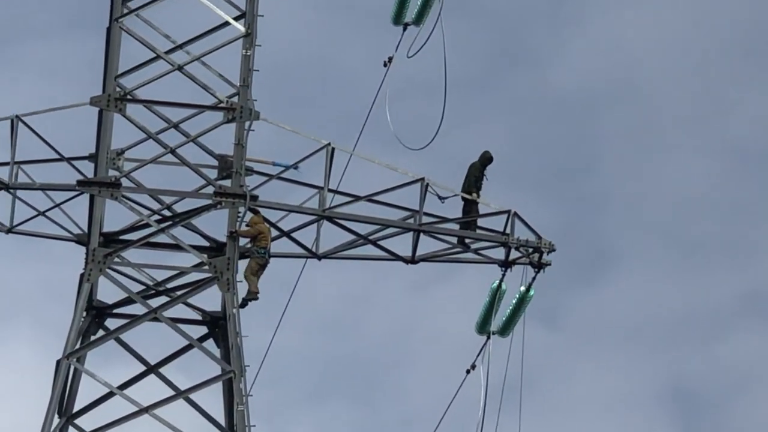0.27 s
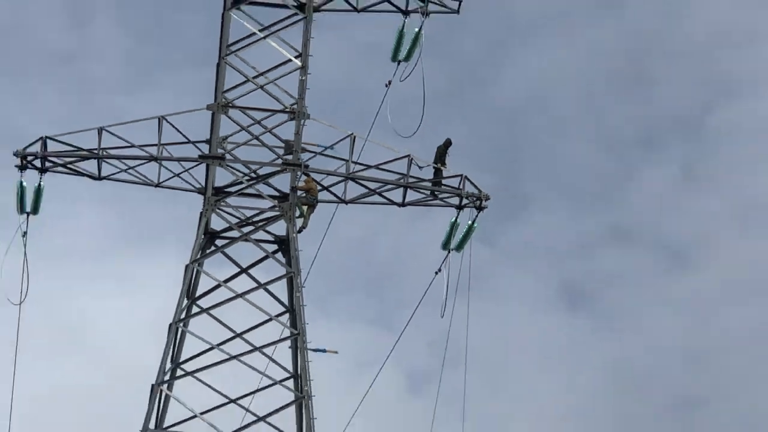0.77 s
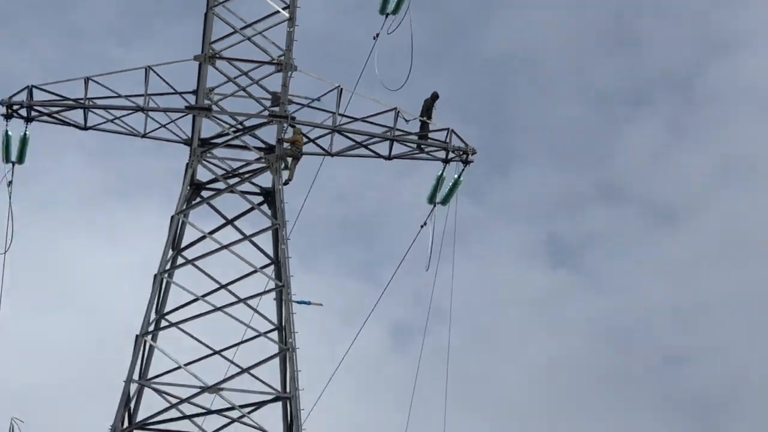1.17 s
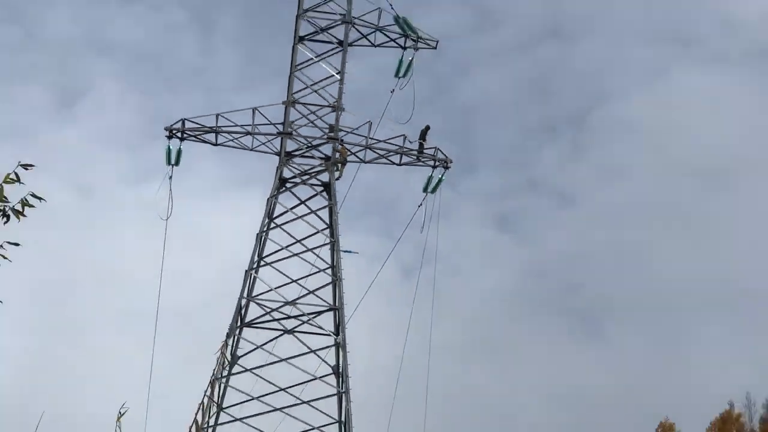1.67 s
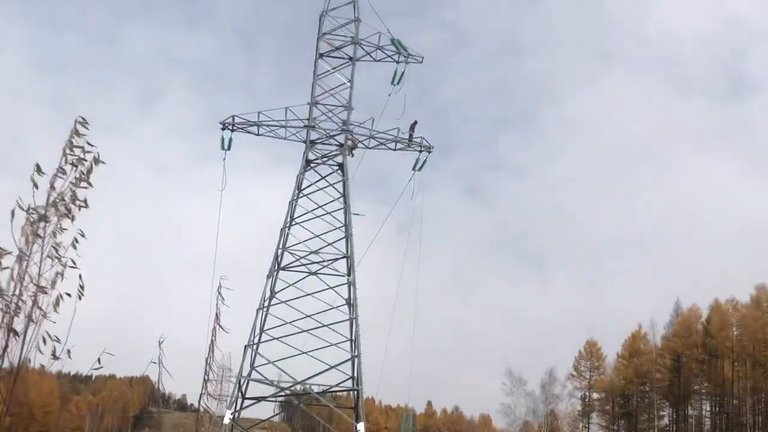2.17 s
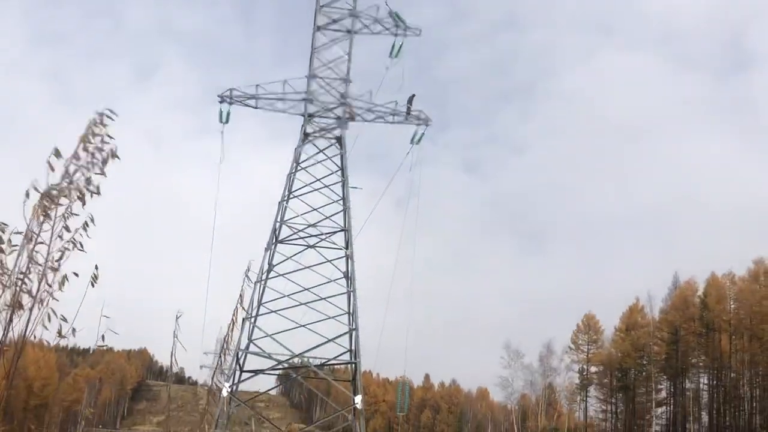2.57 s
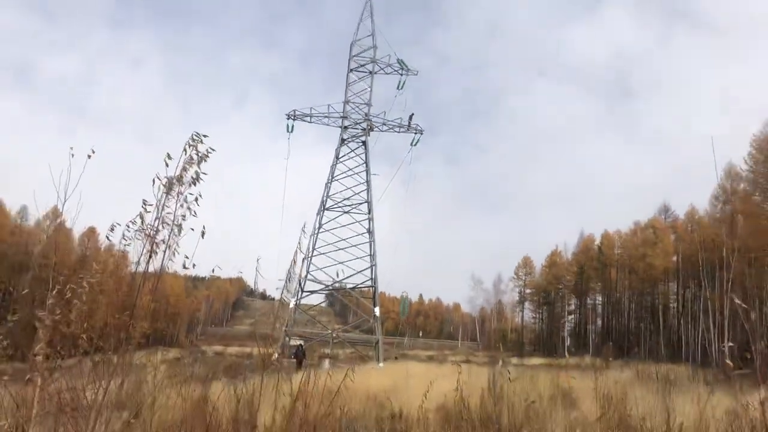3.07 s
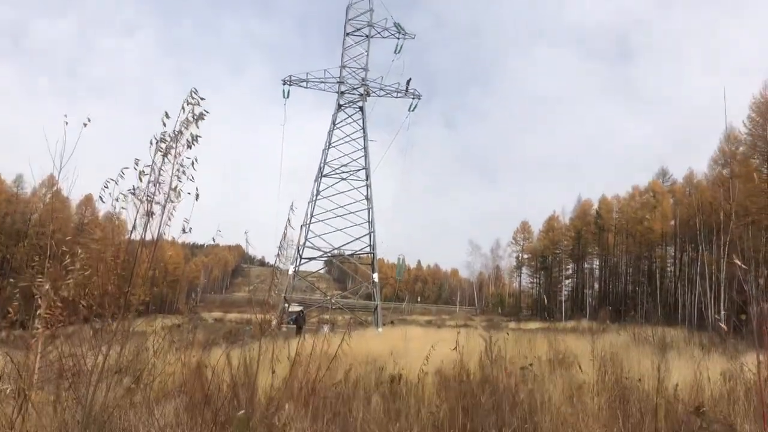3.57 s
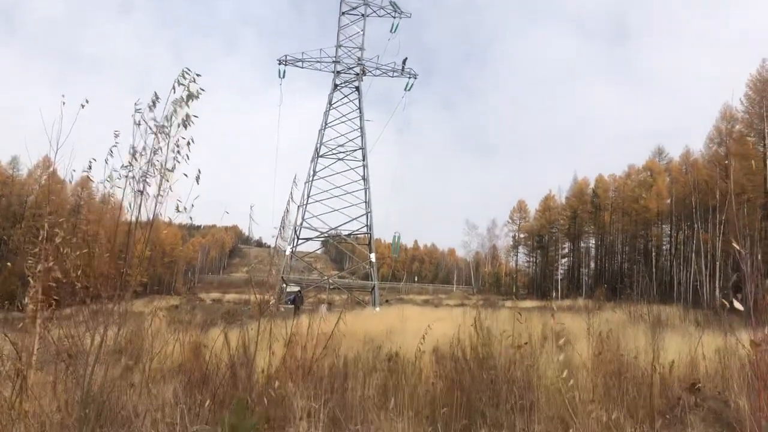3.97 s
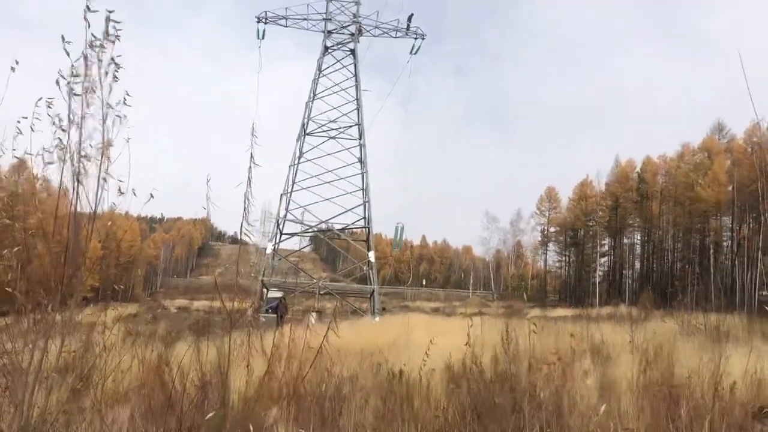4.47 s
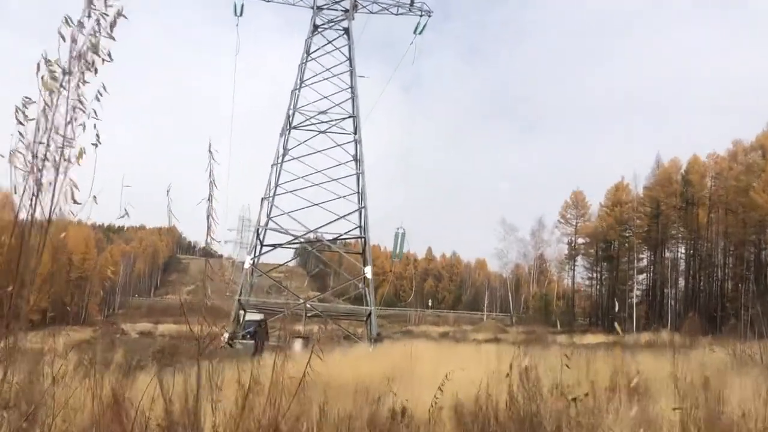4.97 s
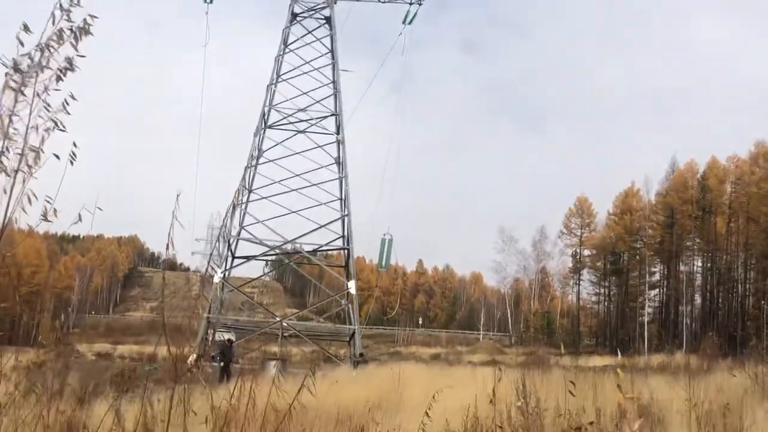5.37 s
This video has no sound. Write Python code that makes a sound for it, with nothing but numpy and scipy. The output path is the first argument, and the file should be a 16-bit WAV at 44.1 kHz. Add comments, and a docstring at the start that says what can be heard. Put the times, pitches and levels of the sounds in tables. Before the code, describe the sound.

Outdoors in an open autumn field, an engine some way off runs at a constant speed, a low buzzing drone with a soft roar and faint metallic ringing. Wind bumps the microphone in short muffled bursts around one second, three seconds and, hardest, four and a half to five. A dry stalk swishes once close by early on, over thin grass hiss.

```python
"""In an open autumn field, an engine runs at a steady speed some way off.
Its exhaust drones and its shafts hum as sums of sinusoids, its gears whine faintly, and filtered noise
gives its roar and ringing casing. Gusts throw eddies at the microphone, each a short low pressure bump.
A stalk swishes and ticks close by in decaying bursts of noise; dry grass hisses as shaped steady noise."""
import sys
import numpy as np
from scipy import signal
from scipy.fft import rfft, irfft
from scipy.io import wavfile

SR = 44100
rng = np.random.default_rng(int(sys.argv[2]) if len(sys.argv) > 2 else 0)


def transcribe(signal):
    """Save signal, clipped to [-1, 1], as a 16-bit WAV file at the path in sys.argv[1]."""
    frames = np.atleast_2d(signal).T
    limited = np.clip(frames, -1, 1)
    pcm = np.round(limited * 32767).astype(np.int16)
    wavfile.write(sys.argv[1], SR, pcm)


N = 247842  # length in samples
TIME, FREQ = np.arange(N) / SR, np.fft.rfftfreq(N, 1 / SR)  # s, Hz

FIRING_HZ = 81.77  # mean firing rate
WHINE_ORDER = 48  # gear whine as a multiple of the firing rate
WHINE_FLUTTER_DB = 1.5  # rms
SWIRL_DB = -11.5  # the swirl around an eddy, relative to its peak
RISE_SHARE = 0.5  # part of a gust's length spent swelling
GUST_EDGE_DB = -6.5  # level at the ends of that length, relative to the crest
EDGE_HZ = 15700  # upper band limit

# Exhaust note and gear tones. Each row: multiple of the firing rate, level in dB rms before fading.
EXHAUST_ORDERS = [(1, -55), (2, -45.5), (3, -58.5), (4, -49.5), (5, -47.5), (6, -55), (7, -55), (9, -65.5),
                  (10, -58.5), (11, -59.5), (12, -63), (13, -72), (15, -73.5), (16, -65.5), (32, -82.5),
                  (40, -79)]
# Hum of other shafts and panels. Each row: mean frequency in Hz, level in dB rms before fading.
SHAFT_HUM = [(35, -61), (53.3, -49.5), (70.1, -43), (105.3, -52), (124, -62), (221, -56.5), (307, -54),
             (320.4, -54.5), (373.8, -52), (467, -62.5), (1203, -73), (2653, -94), (2897, -86), (3305, -84)]
# Gear whine, fading in and out with distance. Each row: time in seconds, level in dB rms before flutter.
GEAR_WHINE = [(0, -88), (.5, -82), (1.09, -75), (1.55, -78), (2.05, -90), (4.85, -84), (5.15, -78),
              (5.62, -83)]
# Ringing of the casing and panels. Each row: centre in Hz, width in Hz, level in dB rms before facing.
CASING_MODES = [(360, 110, -58.5), (603, 33, -61), (1266, 360, -61.5), (1440, 19, -72), (1777, 65, -72.5),
                (1976, 37, -73), (2144, 53, -74), (3300, 110, -77.5), (3950, 160, -77), (4250, 150, -83),
                (4570, 100, -82), (5250, 70, -81.5)]
# The casing is a little louder while the microphone points up. Each row: time in seconds, gain in dB.
CASING_FACING = [(0, 3), (1.4, 0.2), (2.1, 0), (5.62, -1)]
# Spectrum of the engine's broad roar. Each row: frequency in Hz, relative density in dB per Hz.
ROAR_SPECTRUM = [(15, -21.5), (28, 6.5), (50, -9.5), (75, 7), (130, 2.5), (270, -2), (370, -5), (520, -6),
                 (800, -10.5), (1250, -15), (1600, -22), (2100, -23), (2700, -33), (6000, -74)]
# Eddies that thud on their own. Each row: time in seconds, peak in dB, centre in Hz,
# steepness of the treble fall, thinness of the bass (the last two are exponents without unit).
LONE_EDDIES = [(0.3799,-13,202,1.94,0.5), (0.3845,-28.5,510,1.46,1), (0.8212,-22,380,2.2,0.3),
               (0.8312,-15.5,116,1.28,0.37), (0.8982,-14,234,1.47,0.25), (0.927,-21.5,83,2.8,1.4),
               (0.969,-18,100,2.5,1.1), (0.9791,-23,264,1.07,0.2), (0.9884,-21,177.5,2.3,1.5),
               (1.1934,-23,294,2.2,1), (1.2459,-21,110,1.7,0.8), (1.2986,-23.5,63,1.26,1.3),
               (1.3244,-14,315,1.58,1.1), (1.337,-25,116,3.8,1.4), (2.908,-27,256,2.3,1.5),
               (2.9883,-16.5,241,2.5,1.5), (2.999,-19.5,300,1.6,0.8), (3.006,-18,250,3,0.1),
               (3.024,-22,127,1.8,0.3), (3.073,-20,403,2.5,0.3), (3.086,-14.5,270,2.7,1.5),
               (3.091,-17.5,684,2.7,0.6), (3.1053,-20,210,2.1,0.6), (3.1113,-20,303,2.6,1.3),
               (3.1156,-18.5,130,2.2,1.5), (3.1967,-17.5,185,1.07,0.1), (3.2045,-18,195,3.4,0.8),
               (3.2166,-16,170,1.23,0.3), (3.616,-28,171,2.9,1.46), (3.6378,-26,170,2.4,0.1),
               (3.682,-22.5,190,1.3,0.6), (4.1896,-26,170,3,1.5), (4.219,-26,141,2.3,0.7),
               (4.261,-22.5,69.4,1.4,0.3), (4.3598,-22.5,690,1.35,0.04), (4.361,-12,189,1.68,1.5),
               (4.3858,-20,223,3.2,0.25), (4.4042,-24,600,2.6,0.1), (4.408,-16.5,340,1.9,0.4),
               (4.4191,-17,356,2.2,1.5), (4.4236,-17.5,238,1.6,1.4), (4.4345,-6.5,450,2.1,0.2),
               (4.4419,-13.5,297,1.8,0.4), (4.4548,-20.5,283,1.5,1.5), (4.4602,-8.5,490,1.164,0.46),
               (4.474,-20,172,1.6,1.4), (4.5347,-18.5,170,2,1.4), (4.5584,-20,210,2,0.7),
               (4.5764,-18.5,195,1.27,0), (4.589,-23,89,1.3,1.5), (4.7807,-18,160,1.27,1.25),
               (4.826,-14,257,2,0), (4.8365,-20.5,356,1.2,0.1), (4.8424,-13,502,2.4,1.1),
               (4.8502,-19.5,171,3.1,0.3), (4.873,-22,253,1.7,1.1), (4.886,-21,129,1.54,1.5),
               (4.8992,-18,196,1.65,1.5), (4.9208,-24,134,1.5,1.5), (4.9582,-19.5,297,1.04,0.3),
               (4.962,-17.5,151,1.2,1.5), (4.968,-13,717,1.84,0.46), (4.9691,-10,215,1.94,1.4),
               (4.9886,-23,159,2.8,0.8), (5.2822,-24,163,3.3,1.3)]
# Gusts at the microphone. Each row: time of the crest in seconds, level in dB before a common trim,
# length in seconds, centre of its eddies in Hz.
WIND_GUSTS = [(0.458, -33.5, 0.19, 128), (0.885, -32.5, 0.27, 172), (1.21, -32.5, 0.26, 159),
              (2.935, -33, 0.21, 213), (3.088, -35.5, 0.055, 527), (3.423, -37, 0.4, 191),
              (3.65, -34.5, 0.12, 340), (4.44, -31, 0.53, 119), (4.447, -28.5, 0.05, 234),
              (4.88, -34.5, 0.31, 239)]
# Dry stalks close by. Each row: start in seconds, level in dB, centre in Hz, width in octaves,
# time to decay by 60 dB in seconds.
STALK_BRUSHES = [(0.426, -47.5, 5650, 0.58, 0.042), (.45, -69, 6500, 0.6, .7),
                 (3.436, -51, 12800, .1, 0.018), (5.393, -55, 11000, .07, 0.018)]
# Spectrum of the grass hiss. Each row: frequency in Hz, relative density in dB per Hz.
GRASS_SPECTRUM = [(500, -24), (2400, 0), (3200, 5), (3700, 2.5), (4300, 3.5), (5300, -0.5), (7000, -2.5),
                  (9500, -5), (12000, -9.5), (15500, -19)]
# Grass stirred by the breeze. Each row: time in seconds, level in dB before a common trim.
BREEZE_LEVEL = [(0, -75), (.7, -78), (2.8, -71.5), (5.62, -72)]


def gain_of(db):
    """Logarithmic level: 20 dB is a factor of ten in amplitude."""
    return 10 ** (np.asarray(db) / 20)


def evened(x):
    """Normalisation of power: scales to rms 1."""
    return x / np.sqrt(np.mean(x ** 2) + 1e-20)


def along(curve):
    """Linear interpolation: a control curve at every sample."""
    return np.interp(TIME, *np.transpose(curve))


def add(mix, s, sound):
    """Superposition: mixes a sound in at s seconds."""
    part = mix[round(s * SR):][:len(sound)]
    part += sound[:len(part)]


def noise(magnitude):
    """Spectral shaping: white noise filtered by the given magnitude, at rms 1."""
    return evened(irfft(rfft(rng.standard_normal(N)) * magnitude, N))


def colour(points):
    """Magnitude response through (Hz, dB) points on a logarithmic frequency axis."""
    hz, db = np.transpose(points)
    return gain_of(np.interp(np.log(FREQ + 1), np.log(hz), db))


def drift(rate):
    """Low-passed chance of rms 1, changing up to about rate times a second."""
    return noise(np.exp(-(FREQ / rate) ** 2))


def engine_line(turns, multiple, db, blur, fade_db=1.13):
    """Propagation through moving air: a sinusoid whose level fades and whose phase wavers (radians rms)."""
    phase = 2 * np.pi * (multiple * turns + rng.random()) + blur * drift(9.5)
    level = gain_of(db + fade_db * drift(3.5))
    return level * np.sqrt(2) * np.cos(phase)


def casing_ringing():
    """Resonance: each mode of the casing passes a narrow band of noise around its centre."""
    ringing = np.zeros(N)
    for hz, width, db in CASING_MODES:
        resonance = 1 / (1 + (2 * (FREQ - hz) / width) ** 2)
        ringing += gain_of(db) * noise(resonance)
    return gain_of(along(CASING_FACING)) * ringing


def engine(wander=0.00048, hum_blur=0.21, note_blur=0.092, roar_db=-42, throb=0.086, swell_db=0.5):
    """Periodic excitation: tones follow the firing rate, and each firing modulates the broadband noise."""
    turns = np.cumsum(FIRING_HZ * (1 + wander * drift(2.5))) / SR  # firings so far

    note = sum(engine_line(turns, order, db, note_blur) for order, db in EXHAUST_ORDERS)
    hum = sum(engine_line(turns, hz / FIRING_HZ, db, hum_blur) for hz, db in SHAFT_HUM)
    whine_db = along(GEAR_WHINE) + WHINE_FLUTTER_DB * drift(7.5)
    whine = engine_line(turns, WHINE_ORDER, whine_db, hum_blur)

    roar = gain_of(roar_db) * noise(colour(ROAR_SPECTRUM))
    # the noise throbs with each firing, and every second firing is stronger
    chop = 1 + throb * (np.cos(2 * np.pi * turns) + np.cos(np.pi * turns))
    swell = gain_of(swell_db * drift(23))
    return note + hum + whine + (roar + casing_ringing()) * chop * swell


def eddy(hz, steep=1.37, thin=0.29, lag=0.89, lowest_hz=49, size=4096):
    """Dispersion: a mid-array bump whose frequencies each arrive lag cycles late, so it falls in pitch."""
    f = np.fft.rfftfreq(size, 1 / SR) + 1
    bass_cut = np.sqrt(1 + (lowest_hz / f) ** 6)
    body = (f / hz) ** thin * np.exp(-(f / hz) ** steep) / bass_cut
    bump = irfft(body * np.exp(-2j * np.pi * lag * np.log(f / hz)))
    return np.fft.fftshift(bump) * signal.windows.tukey(size) / abs(bump).max()


def wind(swirl_s=0.01094, swirl_octaves=0.74, swirl_top_hz=420, count=8):
    """Turbulent pressure: large eddies thud one by one, each amid a swirl of weaker ones."""
    thuds = np.zeros(N)
    for s, db, hz, steep, thin in LONE_EDDIES:
        bump = eddy(hz, steep, thin)
        start = s - len(bump) / 2 / SR
        add(thuds, start, gain_of(db) * bump)
        for late, higher in rng.uniform(-1, 1, (count, 2)):
            weak_hz = min(hz, swirl_top_hz) * 2 ** (swirl_octaves * abs(higher))
            weak = eddy(weak_hz, steep=1.94, thin=0.9)
            add(thuds, start + swirl_s * late, gain_of(db + SWIRL_DB) * weak / np.sqrt(count))
    return thuds


def gusts(per_s=900, spread_db=2, trim_db=-0.5):
    """Shot noise: random arrivals of faint eddies form a churning stream that swells and dies away."""
    out = np.zeros(N)
    for s, db, length, hz in WIND_GUSTS:
        # 0 at the crest, 1 at either end of the gust's length
        away = np.maximum((s - TIME) / RISE_SHARE, (TIME - s) / (1 - RISE_SHARE)) / length
        strengths = gain_of(spread_db * rng.uniform(-1.7, 1.5, N))
        arrivals = (rng.random(N) < per_s / SR) * strengths
        stream = evened(signal.oaconvolve(arrivals, eddy(hz), "same"))
        out += gain_of(db + trim_db + GUST_EDGE_DB * away ** 1.4) * stream
    return out


def stalks(rise_s=0.0046):
    """Friction and damping: each brush of a stalk is a burst of high noise that decays exponentially."""
    out = np.zeros(N)
    for s, db, hz, octaves, t60 in STALK_BRUSHES:
        band = np.exp(-.5 * (np.log2((FREQ + 1) / hz) / octaves) ** 2)
        envelope = gain_of(db - 60 * TIME / t60) * np.minimum(TIME / rise_s, 1)
        add(out, s, envelope * noise(band))
    return out


def grass(hiss_db=-66, fizz_trim_db=-2, flicker_db=1.7):
    """Incoherent sources: a smooth far hiss with less treble, and a finer near fizz that follows the breeze."""
    spectrum = colour(GRASS_SPECTRUM)
    far = gain_of(hiss_db) * noise(spectrum / (1 + (FREQ / 9000) ** 4))
    near = noise(spectrum * (FREQ / (FREQ + 7000)) ** 2)
    near_db = fizz_trim_db + along(BREEZE_LEVEL) + flicker_db * drift(25)
    return far + gain_of(near_db) * near


def scene():
    """Superposition: the pressures of all sources add at one microphone."""
    return (engine() + wind() + gusts() + stalks() + grass())[None]


def record(dry):
    """Band limitation: the microphone sheds the deepest bass, the ends fade, and the treble is cut."""
    highpass = signal.butter(8, 34, "highpass", fs=SR, output="sos")
    lean = signal.sosfilt(highpass, dry)
    lean = lean * signal.windows.tukey(N, .001)
    lowpass = signal.firwin(511, EDGE_HZ, window=("kaiser", 9), fs=SR)
    return signal.oaconvolve(lean, lowpass[None], "same")


dry = scene()
out = record(dry)
transcribe(out)
```